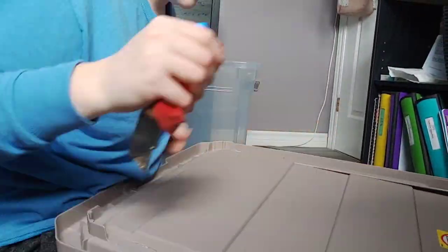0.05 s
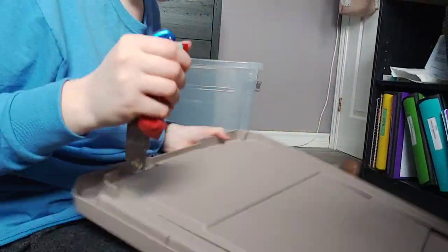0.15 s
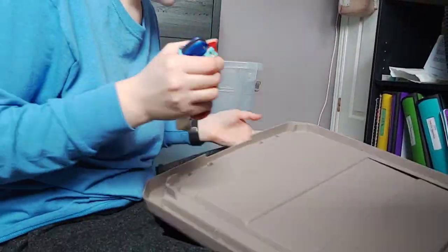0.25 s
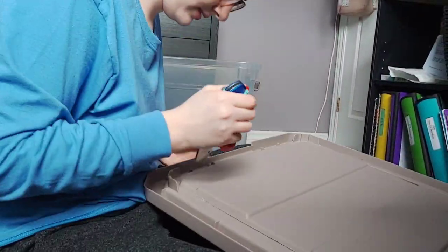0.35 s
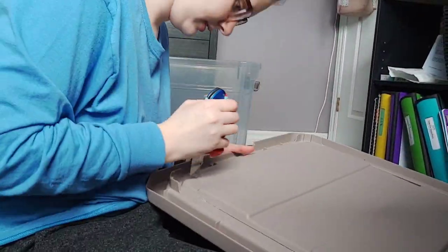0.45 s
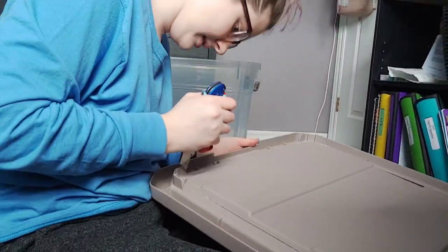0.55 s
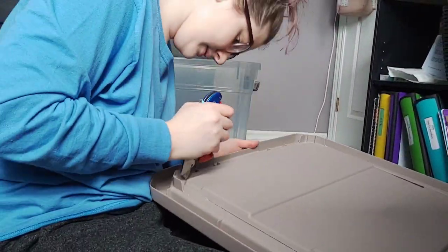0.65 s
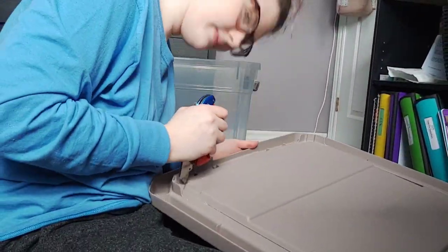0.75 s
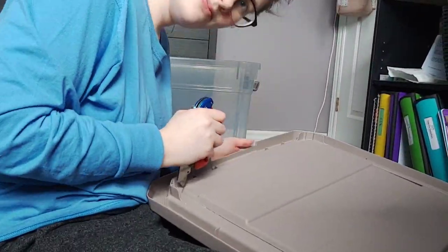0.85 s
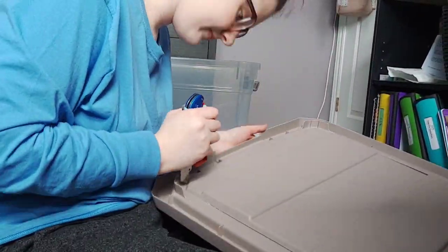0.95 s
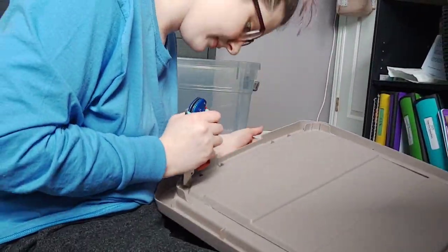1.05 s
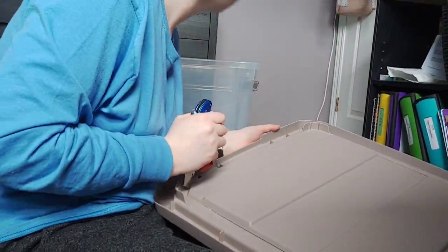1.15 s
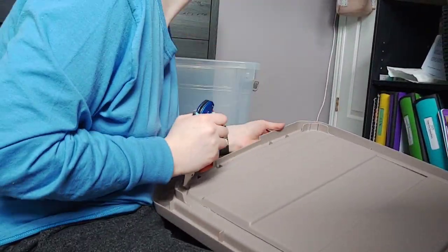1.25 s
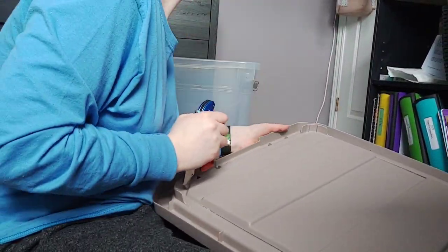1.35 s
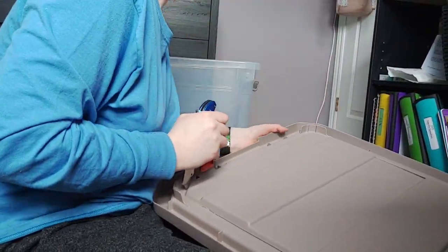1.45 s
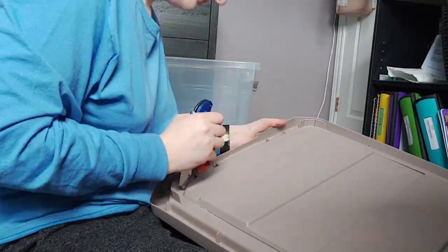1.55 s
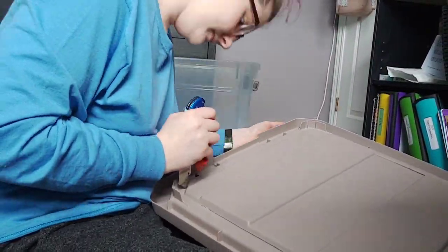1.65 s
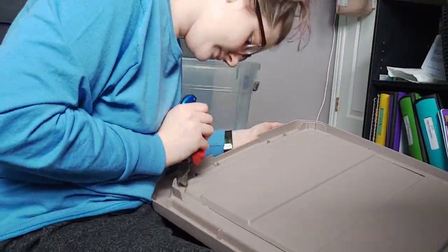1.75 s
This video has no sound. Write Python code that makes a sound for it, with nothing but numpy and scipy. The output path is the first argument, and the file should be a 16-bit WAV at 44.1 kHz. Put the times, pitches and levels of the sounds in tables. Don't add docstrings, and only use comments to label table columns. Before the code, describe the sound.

Loud clack of a tool on a plastic storage lid near the start, a quick rattle and blade hiss, then sparse, much quieter creaks and bumps, heard close up in a small quiet room with faint hiss.

```python
import sys
import numpy as np
from scipy import signal
from scipy.fft import rfft, irfft
from scipy.io import wavfile
from scipy.ndimage import uniform_filter1d

SR = 44100
rng = np.random.default_rng(int(sys.argv[2]) if len(sys.argv) > 2 else 0)


def master_out(mix):
    frames = np.transpose(np.atleast_2d(mix))
    ceiling = np.clip(frames, -1, 1)
    pcm = np.round(ceiling * 32767).astype(np.int16)
    wavfile.write(sys.argv[1], SR, pcm)


def magnitude_from_level(level_db):
    exponent = np.asarray(level_db, float) / 20
    return 10 ** exponent


N = 79380


def evened(x):
    return x / np.sqrt(np.mean(x ** 2) + 1e-20)


def read(points, hz):
    f, value = np.transpose(points)
    return np.interp(np.log(hz + 1), np.log(f + 1), value)


def add(mix, start_s, sound):
    part = mix[:, max(round(start_s * SR), 0):][:, :sound.shape[-1]]
    part += sound[..., :part.shape[1]]


# freq_hz, level_db (per Hz)
AIR_SPECTRUM = [(30, -7), (120, 1.5), (500, -5), (1500, -10), (4000, -17), (7000, -24.5), (11000, -20.5),
                (16000, -25)]
# freq_hz, correlation
AIR_LIKENESS = [(60, -0.61), (380, 0.32), (2380, -0.0), (15000, 0.63)]
AIR_DB, PATCH_DB = -63, 1.2


def air():
    frames, hz = N // 256 + 5, np.fft.rfftfreq(1024, 1 / SR)
    a, b, c, d, patches = rng.standard_normal((frames, 513, 5)).T
    patches = uniform_filter1d(patches, 30, 0)
    patches = evened(uniform_filter1d(patches, 14, 1))
    same = np.clip(read(AIR_LIKENESS, hz), -1, 1)[:, None]
    left = a + 1j * b
    right = same * left + np.sqrt(1 - same ** 2) * (c + 1j * d)
    level_db = read(AIR_SPECTRUM, hz)[:, None] + PATCH_DB * patches
    z = np.array([left, right]) * magnitude_from_level(level_db) * (hz > 30)[:, None]
    tone = signal.istft(z, nperseg=1024, noverlap=768)[1][:, :N]
    return magnitude_from_level(AIR_DB) * evened(tone)


def tail(t60_s, start_s):
    t = np.arange(SR // 2) / SR
    taps = rng.standard_normal((2, len(t))) * magnitude_from_level(-60 * t / t60_s) * (t > start_s)
    return taps / np.linalg.norm(taps[0])


# freq_hz, lead_rad
PORT_LEAD = [(100, 0.071), (500, 0.58), (1000, 0.48), (2000, 1.47), (4000, 1.84), (8000, 1.28),
             (16000, 0.61)]
# freq_hz, level_db
PORT_TILT = [(100, -0.5), (300, 6), (600, -1.5), (1200, 3.5), (2500, 3.5), (8000, 4), (14000, -2.5)]
NEAR_T60_S, NEAR_DB = 0.006, -13
ROOM_HZ, ROOM_T60_S, ROOM_DB = 2500, 0.27, -21.5


def ports(x):
    hz = np.fft.rfftfreq(N, 1 / SR)
    half = magnitude_from_level(read(PORT_TILT, hz) / 2) * np.exp(0.5j * read(PORT_LEAD, hz))
    direct = irfft(rfft(x) * np.array([half, 1 / half]), N)
    bright = signal.sosfilt(signal.butter(2, 900, "high", fs=SR, output="sos"), x)
    dull = signal.sosfilt(signal.butter(2, ROOM_HZ, fs=SR, output="sos"), x)
    near = signal.fftconvolve(bright, tail(NEAR_T60_S, 0.0009), axes=1)[:, :N]
    far = signal.fftconvolve(dull, tail(ROOM_T60_S, 0.002), axes=1)[:, :N]
    return direct + magnitude_from_level(NEAR_DB) * near + magnitude_from_level(ROOM_DB) * far


# freq_hz, level_db, t60_s
LID_MODES = [(75, -10.5, 0.16), (169.56, 1, 0.071), (236.7, -1, 0.062), (320.8, 0.5, 0.05),
             (420, -4, 0.032), (500, 1, 0.035), (572, -2, 0.029), (700, -1.5, 0.025), (852, -6, 0.042),
             (1072, 1, 0.024), (1370, -8, .04), (1607, 0.5, 0.01), (1960, -25.5, 0.034), (2630, -10, 0.031)]
SPREAD_DB_PER_OCT2, PLACE_DB = 7.5, 4
DETUNE, CONTACT_S = 0.048, 0.001


def lid(centre_hz, chance, held):
    hz, db, t60_s = np.transpose(LID_MODES)[:, :, None]
    t = np.arange(6000) / SR
    detune, place, sign = chance[:, :, None]
    hz = hz * (1 + DETUNE * detune)
    db = db - SPREAD_DB_PER_OCT2 * np.log2(hz / centre_hz) ** 2 + PLACE_DB * place
    modes = np.sign(sign) * magnitude_from_level(db - 60 * t / t60_s / held) * np.sin(2 * np.pi * hz * t)
    return modes.sum(0) * np.minimum(t / CONTACT_S, 1)


ALIKE = 0.6


def coloured(x, points, low_hz):
    pair = np.array([x[0], ALIKE * x[0] + np.sqrt(1 - ALIKE ** 2) * x[1]])
    hz = np.fft.rfftfreq(x.shape[1], 1 / SR)
    low_cut = 1 + (low_hz / (hz + 1)) ** 4
    return evened(irfft(rfft(pair) * magnitude_from_level(read(points, hz)) / low_cut, x.shape[1]))


# freq_hz, level_db (per Hz)
GRIT_SPECTRUM = [(700, -4), (1200, 0), (2000, -2), (3000, -5), (4300, -5), (5600, -20), (8000, -36),
                 (16000, -50)]


def rattle(noise):
    return coloured(noise, GRIT_SPECTRUM, low_hz=700)


# freq_hz, level_db (per Hz)
HISS_SPECTRUM = [(1500, 0), (2400, 2.5), (4300, 0.5), (6500, -2.5), (9400, -0.5), (11500, -8.5),
                 (13000, -9), (16000, -17.5)]
# start_s, length_s, lid_db, hiss_db, centre_hz
RUB_EVENTS = [(0., 0.044, -61.5, -64, 220), (.08, 0.16, -45, -54, 373.4), (.129, .028, -29.5, -54, 580),
              (.163, 0.032, -29, -65.5, 700), (.2, 0.14, -50, -55, 500), (.27, 0.11, -41.5, -51.5, 450),
              (.322, 0.058, -45.5, -37, 500), (.42, 0.049, -32.5, -47, 468), (.508, 0.049, -41, -47.5, 420),
              (.55, 0.051, -60.5, -83, 700), (.64, .08, -57, -73, 350), (.88, 0.095, -56.5, -62, 278),
              (.95, 0.052, -57, -65, 1100), (1.005, .05, -52, -57.5, 700), (1.065, 0.065, -57, -58, 900),
              (1.128, 0.069, -45.5, -66.5, 324), (1.175, 0.092, -57, -60, 250),
              (1.21, 0.088, -53, -66, 860), (1.285, 0.065, -50, -64, 556), (1.51, 0.019, -70, -94, 590),
              (1.56, .035, -70, -54, 900), (1.625, 0.052, -39.5, -59, 473), (1.77, .04, -65, -75, 296),
              (.89, .09, -58, -80, 91.4)]
SLIPS_PER_S, SLIP_SIZE_DB, HISS_GRAIN_DB = 2500, 1.5, 1.8
RUB_PEAK = 0.4
HELD, RUB_GRIT_DB = 0.6, -10


def rubs():
    out = np.zeros((2, N))
    chance = rng.standard_normal((30, 3, len(LID_MODES)))
    draws = rng.random((30, 3, 8192))
    noise = rng.standard_normal((30, 2, 2, 8192))
    for k, (start_s, length_s, lid_db, hiss_db, centre_hz) in enumerate(RUB_EVENTS):
        u = np.clip(np.arange(8192) / SR / length_s, 0, 1)
        press = np.sin(np.pi * u ** (np.log(0.5) / np.log(RUB_PEAK))) ** 2
        size = -np.log(draws[k, 1] + 1e-3)
        slipping = draws[k, 0] < SLIPS_PER_S / SR
        slips = slipping * np.sign(draws[k, 2] - 0.5) * magnitude_from_level(SLIP_SIZE_DB * size)
        body = signal.fftconvolve(slips * press, lid(centre_hz, chance[k], HELD))[:8192]
        body = body / np.sqrt(np.sum(body ** 2) / np.sum(press ** 2))
        grain = magnitude_from_level(HISS_GRAIN_DB * size)
        hiss = magnitude_from_level(hiss_db) * coloured(noise[k, 0] * grain, HISS_SPECTRUM, low_hz=1190)
        grit = magnitude_from_level(lid_db + RUB_GRIT_DB) * rattle(noise[k, 1] * grain)
        add(out, start_s, magnitude_from_level(lid_db) * body + (hiss + grit) * press)
    return out


# freq_hz, level_db (per Hz)
CRACK_SPECTRUM = [(1000, -7), (2000, -5), (4200, 0), (6200, -5.5), (9200, -5), (11000, -5), (13000, -26.5),
                  (16000, -28)]
# start_s, thud_db, crack_db, crack_t60_s, centre_hz
KNOCK_EVENTS = [(.039, -64.5, -86, 0.0095, 500), (.1315, -35, -50, 0.011, 573),
                (.1573, -12.5, -15.5, 0.046, 561), (.186, -28.5, -12, 0.025, 700),
                (.211, -30.5, -34.5, 0.022, 550), (.308, -39.5, -45.5, 0.034, 600),
                (.3345, -40, -19.5, 0.038, 900), (.401, -39.5, -60, 0.053, 226),
                (.457, -60, -46.5, 0.021, 500), (.769, -56.5, -49.5, .02, 700),
                (1.015, -49, -62, 0.019, 900), (1.040, -42.5, -56, 0.09, 378),
                (1.229, -48, -60, 0.047, 900), (1.297, -49.5, -73, 0.018, 1070),
                (1.585, -43.5, -48, 0.038, 540), (1.655, -50.5, -54.5, 0.094, 500),
                (1.735, -53.5, -64.5, .02, 350), (.158, -17.5, -58, .03, 172.3),
                (1.629, -48, -65, 0.034, 420), (1.135, -50, -77, .03, 500), (.519, -62, -49.5, .03, 408),
                (.540, -49, -46, 0.073, 400), (1.041, -54.5, -77, 0.038, 80.3),
                (.1865, -34.5, -43, .03, 158)]
CRACK_RISE_S, GRIT_T60_S, KNOCK_GRIT_DB = 0.0012, 0.054, 2.5
GRIT_DB_PER_OCT, GRIT_DB_PER_DB = 2.5, 0.52


def knocks():
    out, t = np.zeros((2, N)), np.arange(6000) / SR
    chance = rng.standard_normal((30, 3, len(LID_MODES)))
    noise = rng.standard_normal((30, 2, 2, 6000))
    rise = np.minimum(t / CRACK_RISE_S, 1)
    for k, (start_s, thud_db, crack_db, crack_t60_s, centre_hz) in enumerate(KNOCK_EVENTS):
        ring = lid(centre_hz, chance[k], 0.98)
        thud = magnitude_from_level(thud_db) * ring / np.sqrt(np.mean(ring[:400] ** 2))
        crack = coloured(noise[k, 0], CRACK_SPECTRUM, low_hz=900) * magnitude_from_level(crack_db - 60 * t / crack_t60_s)
        grit_db = thud_db + GRIT_DB_PER_DB * (thud_db + 13) + KNOCK_GRIT_DB
        grit_db = grit_db + GRIT_DB_PER_OCT * np.log2(centre_hz / 500)
        grit = rattle(noise[k, 1]) * magnitude_from_level(grit_db - 60 * t / GRIT_T60_S)
        add(out, start_s, thud + (crack + grit) * rise)
    return out


def scene():
    return ports(knocks() + rubs()) + air()


def low_pass(x):
    return signal.sosfilt(signal.butter(12, 16430, fs=SR, output="sos"), x)


EDGE_HZ, OFFSET = 15800, -0.0033


def record(dry):
    lowpass = signal.firwin(255, EDGE_HZ, fs=SR)
    band = signal.oaconvolve(np.clip(dry, -1, 1), lowpass[None], "same")
    return low_pass(band + OFFSET)


dry = scene()
out = record(dry)
master_out(out)
```